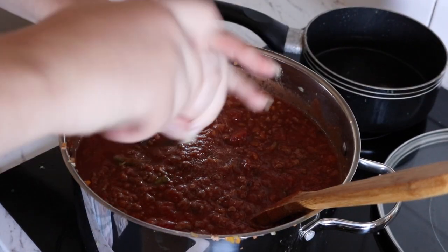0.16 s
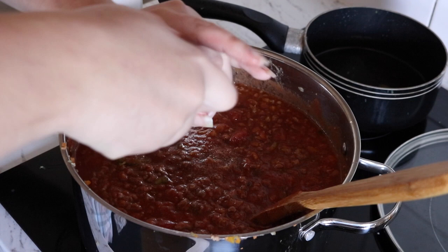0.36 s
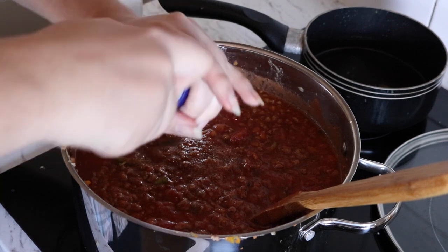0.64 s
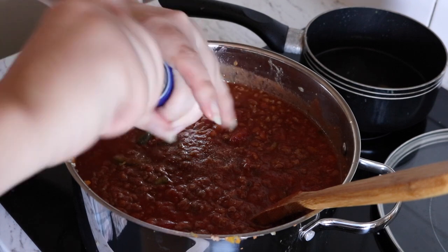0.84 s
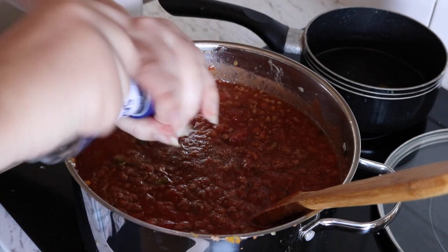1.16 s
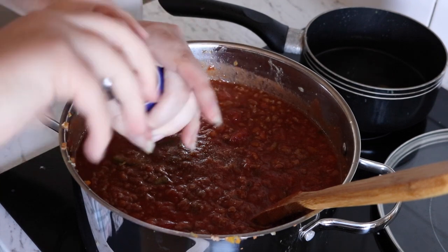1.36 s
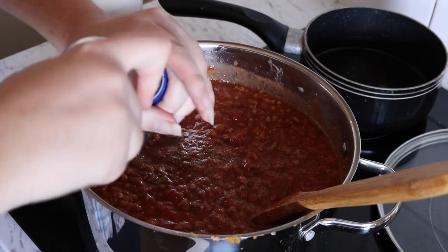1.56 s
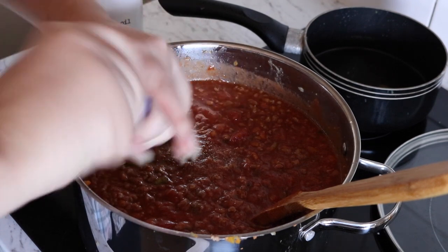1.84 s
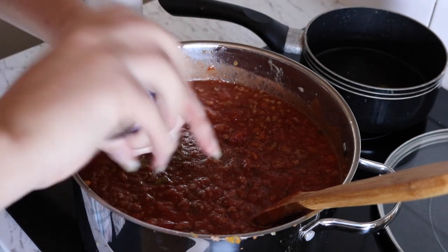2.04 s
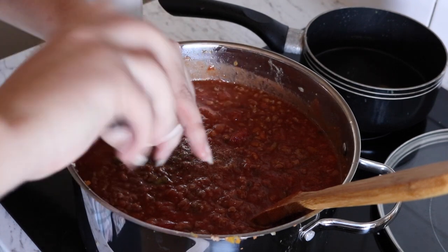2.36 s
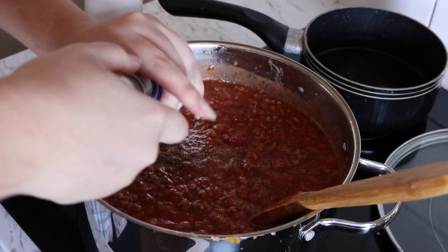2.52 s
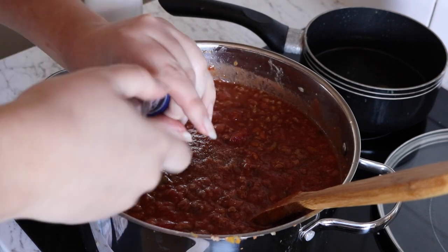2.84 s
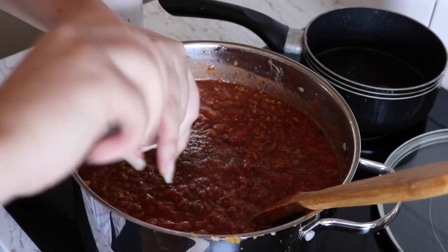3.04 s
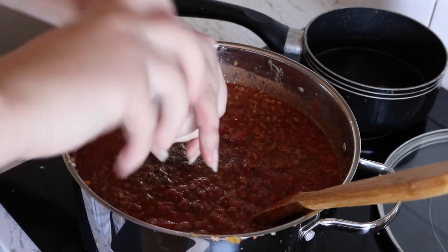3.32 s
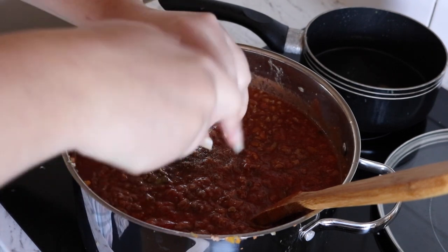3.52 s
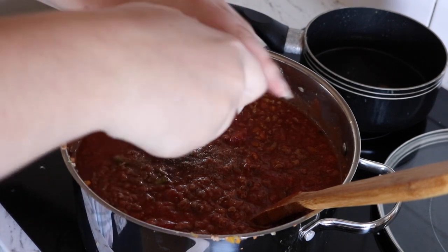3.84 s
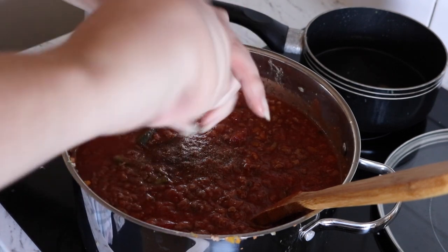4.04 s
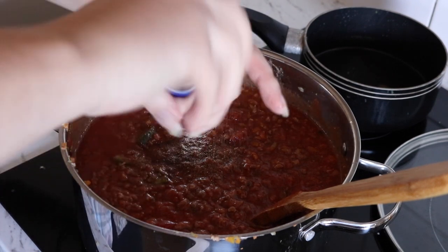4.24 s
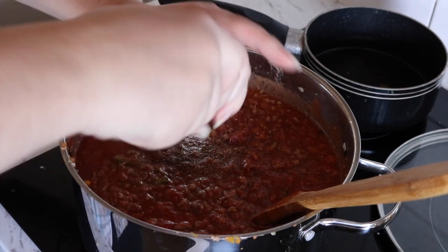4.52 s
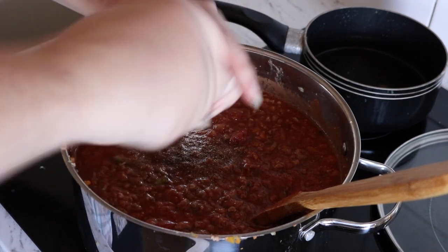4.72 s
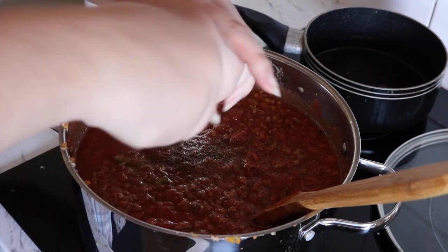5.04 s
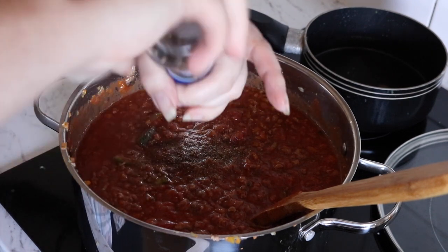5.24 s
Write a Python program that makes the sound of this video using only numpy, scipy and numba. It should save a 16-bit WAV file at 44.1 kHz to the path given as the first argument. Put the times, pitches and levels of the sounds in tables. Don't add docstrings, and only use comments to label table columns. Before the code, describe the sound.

A small glass-jar pepper mill is twisted above a pan, close to the microphone in a tiled kitchen. Dry, bright crunches of less than a tenth of a second begin at about 0.06, 0.34, 0.65 and 0.92 s. Then comes a pause with one hard crack at 1.2 s and scattered glassy ticks of loose corns. Grinding resumes at 1.55 s and continues from 1.9 s at roughly 0.3 s intervals until a weak last stroke at 5.38 s. Each stroke is a dense gritty crackle; splitting corns snap loudly, notably near 0.69, 1.94, 2.26, 2.55, 3.82, 4.43 and 4.77 s, ringing the mill and slightly clipping. The stroke near 3.47 s is softer. Thin chips and high ticks fall between strokes. Pan and walls give a quick, short echo. Underneath are steady soft hiss and a faint low motor hum, swelling around 3.0 and 4.4 s.

```python
import sys
import numpy as np
from scipy import signal
from scipy.fft import rfft, irfft
from scipy.io import wavfile
from scipy.ndimage import uniform_filter1d
from numba import njit

SR = 44100
rng = np.random.default_rng(int(sys.argv[2]) if len(sys.argv) > 2 else 0)


def invert_db(level):
    return 10 ** (np.asarray(level, dtype=float) / 20)


def materialize(psi):
    bounded = np.clip(np.atleast_2d(psi).T, -1, 1)
    quanta = np.round(bounded * 32767).astype(np.int16)
    wavfile.write(sys.argv[1], SR, quanta)


N = 237258
LEAD = int(.4 * SR)
TIME_S = (np.arange(LEAD + N) - LEAD) / SR

# (start [s], length [s], level at start [dB], level at end [dB],
# top octave against the rest [dB])
STROKES = [(.062, 0.092, -33, -21.5, -14), (.34, 0.068, -30.5, -17, -16), (.62, 0.0085, -31, -34, -18),
           (.654, 0.057, -20, -26, -16), (.916, 0.063, -28, -21, -11), (1.54, 0.018, -28, -37, -14),
           (1.588, 0.024, -16.5, -38, -13), (1.895, 0.068, -21.5, -21.5, -22),
           (2.205, 0.064, -19, -19, -16), (2.51, 0.077, -23, -20, -14), (2.811, .083, -24.5, -22.5, -16),
           (3.148, 0.078, -18.5, -22.5, -17.5), (3.468, 0.082, -26.5, -28, -18),
           (3.78, 0.069, -22.5, -20.5, -16), (4.093, 0.058, -24, -20, -16), (4.424, 0.076, -22, -23, -13),
           (4.74, 0.013, -25, -32.5, -18), (4.772, 0.054, -18.5, -18.5, -14.5),
           (5.053, 0.083, -18, -25.5, -18), (5.378, .05, -37, -28, -18)]
# (time [s], peak [dB], ring [Hz], snap against peak [dB], snap [Hz])
SPLITS = [(0.1067, -13.5, 1730, -5, 7860), (0.1404, -12, 1800, -13, 6500), (.1588, -14.5, 1780, 9, 5700),
          (.394, -2.5, 1880, 6, 5530), (0.6908, -1, 1740, 5, 5500), (0.7053, -12, 1600, 8.5, 6200),
          (.9514, -12, 1850, 5.5, 8600), (1.5819, -3.5, 1840, 1.5, 4430), (1.9374, 2, 2524, 1.7, 7310),
          (1.95, -15, 2040, 13, 5370), (1.9762, -13, 1980, -16, 5650), (2.259, 0.5, 1970, -5, 5300),
          (2.5219, -5, 1860, -15, 6150), (2.5508, 3.5, 2080, 3.5, 6160), (3.5051, -10.5, 1860, 9, 5670),
          (3.5462, -22, 1860, 10.5, 5500), (3.8034, -10, 1680, 14, 5800), (3.8237, 0, 1690, 1, 5250),
          (3.8469, -8, 1680, 2.5, 6260), (4.147, -3, 1710, -5.5, 5730), (4.4304, 2.2, 2050, -9, 8000),
          (4.8174, -8, 1930, 8, 7800), (5.0749, -22, 1810, 18.5, 5440), (5.1126, -13.5, 1770, 11, 8100)]


@njit
def svf(x, hz, width):
    y, band_state, low_state = np.empty(len(x)), 0., 0.
    for i in range(len(x)):
        g, k = np.tan(np.pi * hz[i] / SR), width / hz[i]
        v = (band_state + g * (x[i] - low_state)) / (1 + g * (g + k))
        band_state = 2 * v - band_state
        low_state += 2 * g * v
        y[i] = k * v
    return y


def band(x, hz, width_hz):
    return svf(x, np.full(len(x), 1. * hz), 1. * width_hz)


def click_gain(width_hz):
    return SR / (2 * np.pi * width_hz)


def modes(x, table):
    out = 0
    for k, (hz, width_hz, db) in enumerate(table):
        out = out + (-1) ** k * invert_db(db) * band(x, hz, width_hz) * click_gain(width_hz)
    return out


def unit(x):
    return x / np.sqrt(np.mean(x ** 2))


def bumps(t, at_s, db, lasting_s):
    return sum(invert_db(d) * np.exp(-((t - s) / w) ** 2) for s, d, w in np.broadcast(at_s, db, lasting_s))


def sparse(per_s, spread_db, most):
    chance = rng.random((3, LEAD + N))
    sizes = invert_db(spread_db * np.minimum(-np.log(1 - chance[1]), most))
    signs = np.sign(chance[2] - .5)
    return unit((chance[0] < per_s / SR) * sizes * signs)


def fracture(times, db, last_s, rip_db, size=512):
    t = np.arange(size) / SR
    rips = rng.standard_normal((len(times), size)) * np.exp(-t / last_s)
    rips *= invert_db(rip_db) / np.sqrt(np.sum(rips ** 2, axis=1, keepdims=True))
    rips[:, 0] = np.sign(rips[:, 0])
    starts = LEAD + np.round(np.asarray(times) * SR).astype(int)
    at = starts[:, None] + np.arange(size)
    out = np.zeros((np.shape(db)[0], LEAD + N + size))
    for row, gain in zip(out, invert_db(db)):
        np.add.at(row, at, rips * gain[:, None])
    return out[:, :LEAD + N]


def room_hiss():
    # (frequency [Hz], density [dB per Hz])
    hiss_colour = [(15, 4), (25, 4), (153, 5.5), (1040, 3), (1260, -12), (2160, 8), (2840, -4.5),
                   (5880, -5), (9320, -5), (10100, -12), (16000, -15)]
    corner_hz, corner_db = np.transpose(hiss_colour)
    hz = np.maximum(np.arange(N // 2 + 1) * SR / N, 1)
    colour = invert_db(np.interp(np.log(hz), np.log(corner_hz), corner_db))
    hiss = irfft(rfft(rng.standard_normal(N)) * colour, N)
    return invert_db(-50.5) * unit(hiss)


def appliance_hum():
    # (time [s], level [dB], lasting [s])
    swells = [
        (.25, -70, 0.18),
        (.95, -69, 0.056),
        (1.8, -59.5, 0.15),
        (3.01, -50, 0.067),
        (3.22, -62, 0.095),
        (3.8, -64, .15),
        (4.42, -54, 0.098),
        (4.77, -66, 0.033),
        (5.3, -78, 0.17),
    ]
    hum_hz, width_hz, steady_db = 115.7, 4.1, -66
    t = np.arange(N) / SR
    waver = unit(band(rng.standard_normal(N), hum_hz, width_hz))
    hum = np.sin(2 * np.pi * hum_hz * t) + .5 * waver
    return (invert_db(steady_db) + bumps(t, *np.transpose(swells))) * unit(hum)


def response():
    # (centre [Hz], pan and hob t60 [s], their level [dB], walls t60 [s], their level [dB])
    echo_bands = [(407, 0.066, 8, 0.64, -4), (626, 0.18, -38, 0.5, -5), (1480, 0.48, -26, 0.7, -17.5),
                  (2460, 0.067, -4.5, 0.44, -5.5), (3330, 0.031, -1, 0.62, -9),
                  (5860, 0.044, -40, 0.49, -9), (10020, 0.032, -3.5, 0.3, -7.5),
                  (12300, 0.013, -74.5, 0.29, -12)]
    # (delay [s], level [dB])
    hard_returns = [
        (.0011, -9),
        (.0041, -8.5),
        (.0095, -16),
    ]
    t = np.arange(int(.7 * SR)) / SR
    out = np.zeros(len(t))
    for hz, near_s, near_db, wall_s, wall_db in echo_bands:
        for t60, db, after_s in ((near_s, near_db, .001), (wall_s, wall_db, .008)):
            noise = band(band(rng.standard_normal(len(t)), hz, .8 * hz), hz, .8 * hz)
            onset = np.clip(t / after_s - 1, 0, 1)
            fade = 1000 ** (-t / t60) * onset / np.sqrt(t60 * SR / np.log(1e6))
            out += invert_db(db) * noise * fade * 2
    out[0] = 1
    for delay_s, db in hard_returns:
        out[int(delay_s * SR * rng.uniform(.93, 1.07))] += invert_db(db) * rng.choice([-1, 1])
    return out


def kitchen(x, count=4):
    turn = np.arange(len(x)) / SR / .13 % count
    out = 0
    for k in range(count):
        distance = np.abs((turn - k + count / 2) % count - count / 2)
        share = np.cos(np.pi / 2 * np.clip(distance, 0, 1))
        out = out + signal.fftconvolve(x * share, response())[:len(x)]
    return out


def glass(shaking):
    # (time [s], peak [dB])
    loose_ticks = [(.328, -24), (.377, -19), (.6584, -14), (.85, -40), (.9403, -19), (1.128, -24.5),
                   (1.2575, -19), (1.278, -23), (1.296, -20.5), (1.4277, -31), (1.4583, -23), (1.492, -23),
                   (1.5459, -23), (2.176, -29), (2.2468, -26), (2.4463, -36), (2.4774, -27), (3.122, -43),
                   (3.4101, -39), (3.6396, -30), (4.0956, -23), (4.359, -21), (4.4643, -21), (4.6957, -34),
                   (4.8035, -20), (5.354, -32)]
    # (frequency [Hz], width [Hz], level [dB])
    jar_ring = [(10030, 196, -4.5)]
    thrown = [(s, db - 19) for s, db, *_ in SPLITS]
    tick_s, tick_db = np.transpose(list(loose_ticks) + thrown)
    ticks = fracture(tick_s, tick_db[None], last_s=0.0027, rip_db=-18.0)[0]
    tilt_s = np.transpose(STROKES)[0] - 0.017
    tilting = invert_db(-53) + bumps(TIME_S, tilt_s, -61.5, 0.042)
    rolling = tilting * invert_db(-14.5) * sparse(per_s=300, spread_db=8.5, most=2.6)
    taps = ticks + rolling + invert_db(-57) * shaking
    return band(modes(taps, jar_ring), jar_ring[0][0], 1400)


def wrist(t):
    grip_s, grip_db, arch_db, let_go_s, let_go_db = 0.012, -18, 3, .012, -10.5
    force = invert_db(-14) * ((t > -0.189 - .1) & (t < -0.189))
    for s, length, first, last, _ in STROKES:
        at = s + np.array([-grip_s, 0, length / 2, length, length + let_go_s])
        db = [first + grip_db, first, (first + last) / 2 + arch_db, last, last + let_go_db]
        force = force + invert_db(np.interp(t, at, db, left=-200, right=-200))
    return uniform_filter1d(force, int(0.0018 * SR))


def crushing(per_s=2500, spread_db=3.5, rub_db=-8, slips_per_s=150, slip_s=0.003, steady=1.0):
    crackle_db = (-12.5, -9, 0.5, 1.5)
    slips = np.abs(sparse(slips_per_s, spread_db=3, most=2))
    dying = signal.lfilter([1], [1, -np.exp(-1 / (slip_s * SR))], slips)
    bursts = unit(steady + unit(dying))
    grit = sparse(per_s, spread_db, most=3.23) + invert_db(rub_db) * rng.standard_normal(LEAD + N)
    grit = 0.24 * wrist(TIME_S) * bursts * grit
    start_s, *_, top_db = np.transpose(STROKES)
    airy = invert_db(np.interp(TIME_S, start_s, top_db))
    return invert_db(np.array(crackle_db))[:, None] * np.array([grit, grit, grit, grit * airy])


def cracks_in_order():
    # (time [s], peak [dB], ring
    # [Hz], knock against peak [dB], snap against peak [dB])
    bites = [(0.0635, -30, 1690, 6.5, -6), (.3384, -16, 1990, -6, 5.5), (0.6529, -4, 1750, -4.5, 0),
             (0.9112, -14.5, 1890, -6, -5), (1.201, -3, 2110, -10, 0), (1.5351, -17.5, 2490, -8, -8),
             (1.8869, -9.5, 2600, -17, -9), (1.914, -2.5, 2060, -8.5, 5.5), (2.2033, -6.5, 1960, -14, 6),
             (2.5078, -12, 1750, -3.5, 8.5), (2.5513, -4.5, 2075, -0.5, -15), (2.8042, -16, 2470, -2, -8),
             (2.8271, -11.5, 2030, -5.5, -6), (2.8533, -6, 1976, -4, -12), (3.1462, -10, 1840, -15, -15),
             (3.1961, -19, 2300, -1, 7), (3.774, -18, 1790, 4.5, -9), (4.095, -16, 2770, -1.5, 2),
             (4.107, -12, 2030, -7.5, -11), (4.4226, -6.5, 2630, -6.5, 7), (4.4635, -13.5, 1760, 3.5, 6),
             (4.745, -16, 1990, 0, -9), (4.772, -1, 1980, -12, -4), (5.0488, -22, 2200, 8, -7)]
    # (time [s], peak [dB], snap against peak [dB], snap [Hz])
    chips = [(0.0833, -11, 0, 8600), (0.359, -31, -6, 4390), (.6174, -20, -9, 8260),
             (.9338, -9.5, 0.5, 8600), (1.1278, -27.5, 9.5, 7040), (1.177, -30.5, 5, 7400),
             (1.2006, -16.5, 20, 6700), (1.3147, -35, 9, 6340), (1.335, -27, -3, 6400),
             (1.444, -53.5, 25, 7200), (1.457, -50, 8.5, 7060), (1.4854, -50, 15, 9100),
             (1.5902, -22.5, 16.5, 8500), (1.615, -35, 23, 7740), (1.866, -28.5, -5, 4900),
             (2.189, -20.5, 4, 8250), (2.2734, -30, 20.5, 8300), (2.548, -13, 9, 7360),
             (2.8928, -34, 3, 5170), (3.1368, -26, 10, 8100), (3.1564, -7, -0.5, 8300),
             (3.3438, -36, 8, 5280), (3.47, -26, 7, 8160), (4.3584, -42, 9, 9200), (2.8528, -11, 5, 5740),
             (4.4444, -3.5, 3, 5400), (4.4534, -15, 10, 8700), (4.6973, -28.5, 11.5, 3400),
             (5.0648, -25, 18, 4730), (5.3714, -30, -9, 7390)]
    split_knock_db, chip_knock_db = -15.5, -11
    chip_ring_hz, bite_snap_hz = 2165, 5500
    rows = [(*bite, bite_snap_hz) for bite in bites]
    rows += [(s, db, hz, split_knock_db, snap_db, snap_hz) for s, db, hz, snap_db, snap_hz in SPLITS]
    rows += [(s, db, chip_ring_hz, chip_knock_db, snap_db, snap_hz) for s, db, snap_db, snap_hz in chips]
    return np.transpose(sorted(rows))


def mill(knock, shell, snap, air, ring_hz):
    # (frequency [Hz], width [Hz], level [dB])
    knock_modes = [(280, 350, -19.5), (800, 170, -8), (1000, 180, -2), (1170, 220, -2)]
    shell_modes = [(1690, 196, -2.5), (2228, 534, 4), (2803, 308, -3), (3640, 1020, -1.5)]
    snap_modes = [(4670, 610, -4.5), (5255, 1370, 2.5), (6474, 1276, 3), (7025, 940, 0.5),
                  (8450, 1770, 1.5)]
    air_modes = [(11280, 3100, 1.4), (13360, 1560, 6.1), (14730, 1200, 4)]
    ring_width_hz = 128.
    ring = invert_db(-5.5) * svf(shell, ring_hz, ring_width_hz) * click_gain(ring_width_hz)
    body = modes(knock, knock_modes) + modes(shell, shell_modes)
    return body + ring + modes(snap, snap_modes) + modes(air, air_modes)


def grinder():
    crack_db = (-3.5, -7.5, 1, -16.5)
    s, db, ring_hz, knock_db, snap_db, snap_hz = cracks_in_order()
    parts_db = db + np.array([knock_db, 0 * db, snap_db, snap_db]) + np.array(crack_db)[:, None]
    cracks = fracture(s, parts_db, last_s=0.0041, rip_db=-1.5)
    latest = np.maximum(np.searchsorted(s, TIME_S + 0.0027) - 1, 0)
    snap_width_hz = 1260.
    snap = svf(cracks[2], snap_hz[latest], snap_width_hz)
    snap = svf(snap, snap_hz[latest], 2 * snap_width_hz)
    cracks[2] *= invert_db(-7)
    drive = crushing() + cracks
    return mill(*drive, ring_hz[latest]) + invert_db(14) * snap + glass(drive[2])


def scene():
    background = room_hiss() + appliance_hum()
    return (background + kitchen(grinder())[LEAD:])[None]


def band_limit(x):
    return signal.sosfilt(signal.butter(12, 16250, fs=SR, output="sos"), x)


def record(dry):
    top_cut = signal.ellip(10, .2, 60, 15720, fs=SR, output="sos")
    cut = signal.sosfilt(top_cut, dry)
    over = cut - np.clip(cut, -1, 1)
    no_thump = signal.butter(1, 200, "high", fs=SR, output="sos")
    shaved = cut - signal.sosfiltfilt(no_thump, over)
    mix = np.clip(shaved, -1, 1)
    return band_limit(mix)


dry = scene()
out = record(dry)
materialize(out)
```